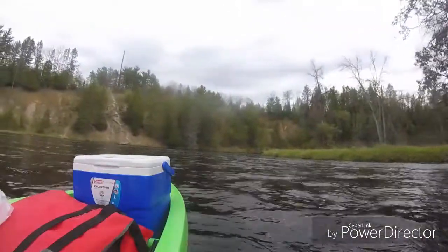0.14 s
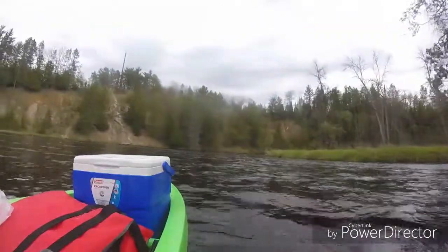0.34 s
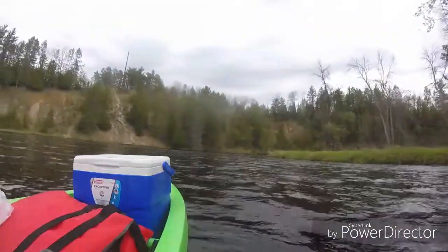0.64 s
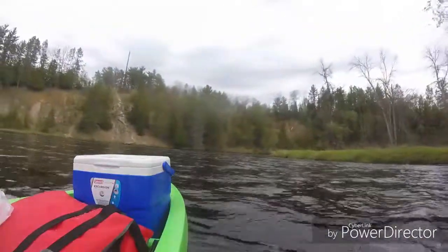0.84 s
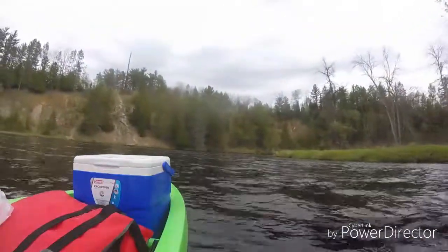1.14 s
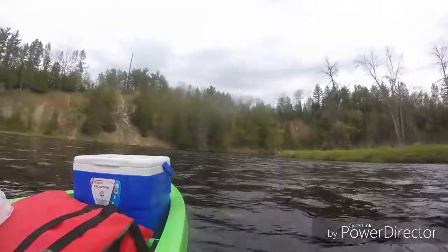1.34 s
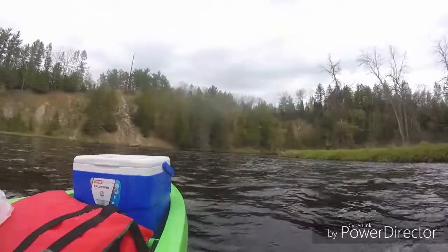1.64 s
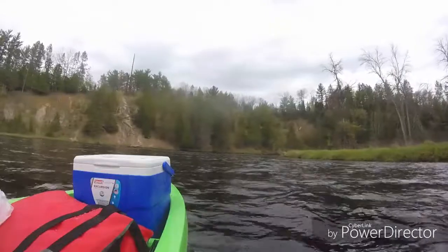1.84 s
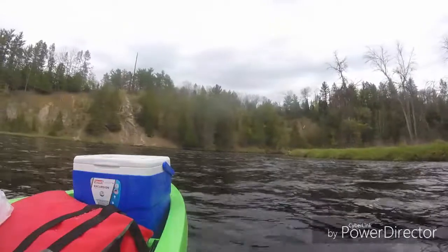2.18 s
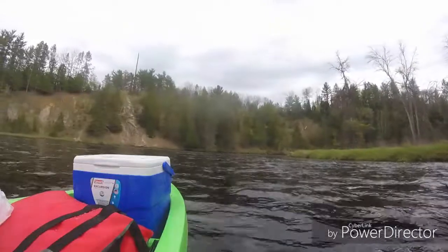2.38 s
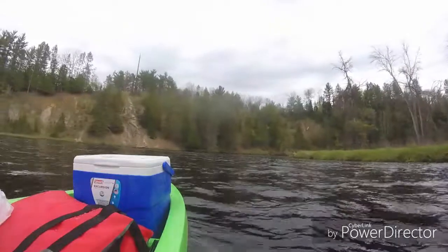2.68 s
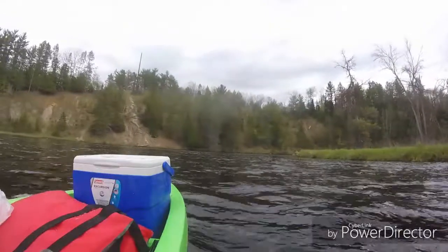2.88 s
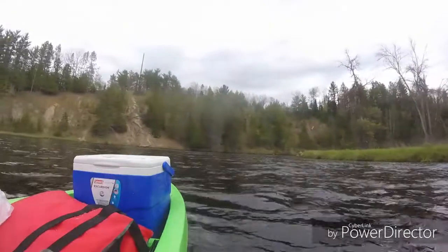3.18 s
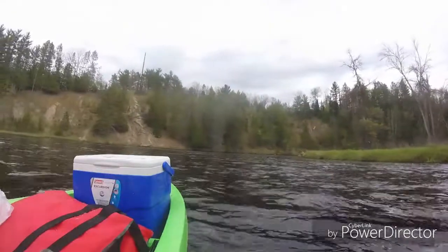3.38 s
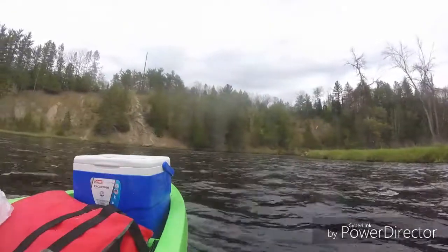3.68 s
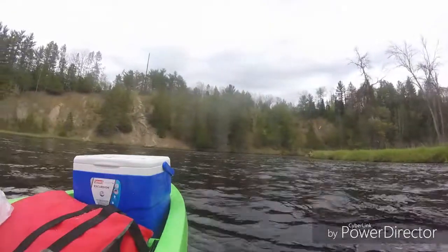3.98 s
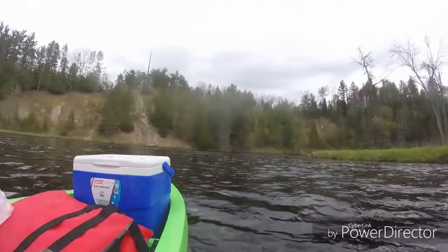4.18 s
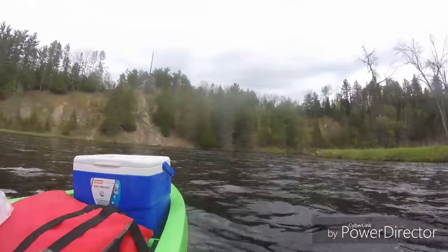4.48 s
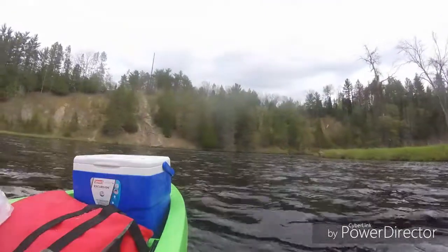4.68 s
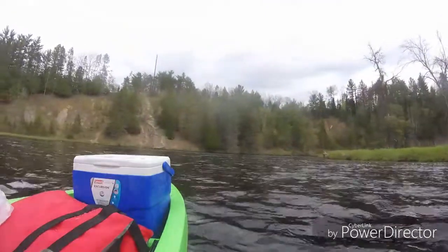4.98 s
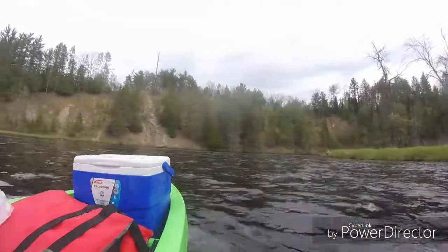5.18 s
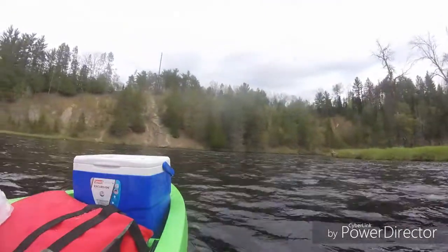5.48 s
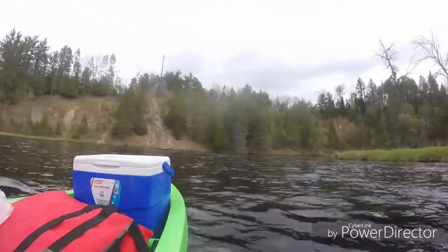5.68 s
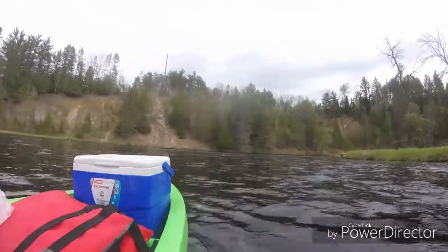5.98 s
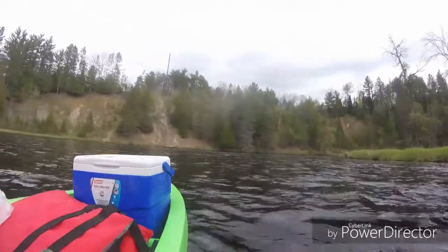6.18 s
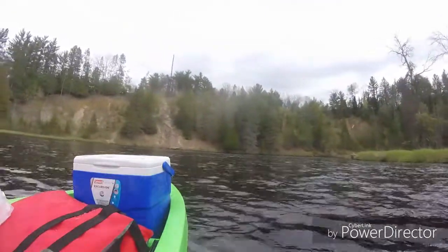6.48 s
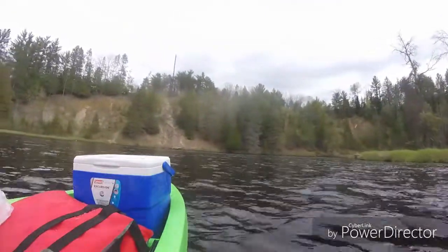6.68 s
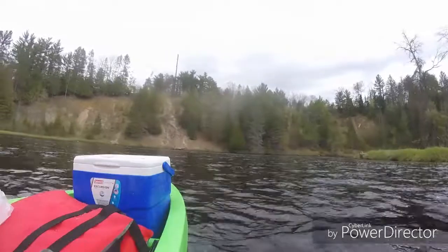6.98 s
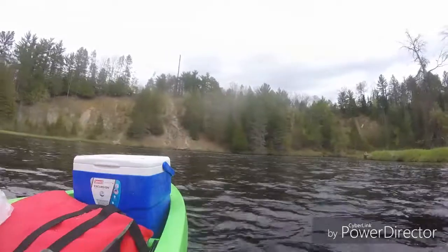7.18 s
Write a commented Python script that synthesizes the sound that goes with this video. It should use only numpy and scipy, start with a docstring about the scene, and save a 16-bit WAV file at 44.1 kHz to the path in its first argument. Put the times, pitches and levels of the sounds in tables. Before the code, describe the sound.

Irregular hollow knocks and gulps of water under a small plastic boat, soft river murmur, scattered drops, and a small bird trilling twice.

```python
"""Kayak on a river

A plastic kayak drifts downstream, heard from the cockpit; filtered noise and small bubbles murmur all around.
Wavelets slap the hull with noise bursts and trap air that gulps as swelling sines, ringing the hollow boat's modes.
Crests smack and spray in bubble clusters, drips and plops fall nearby, drops tick as clicks, pulses creak low.
A small bird on the bank sings two four-note trills of gliding tones; a farther one slurs and chirps."""
import sys
import numpy as np
from scipy import signal
from scipy.fft import rfft, irfft
from scipy.io import wavfile
from scipy.ndimage import uniform_filter1d

SR = 44100
rng = np.random.default_rng(int(sys.argv[2]) if len(sys.argv) > 2 else 0)


def digitize_waveform(pressure):
    """Quantize a signal to 16-bit integers and store it at the path in sys.argv[1].

    Rows of a 2-D input are taken as channels; values are limited to [-1, 1].
    """
    field = np.atleast_2d(pressure).T
    bounded = np.clip(field, -1, 1)
    quanta = np.round(bounded * 32767).astype(np.int16)
    wavfile.write(sys.argv[1], SR, quanta)


N = 323694
TIME = np.arange(N) / SR
SHORT = TIME[:SR // 4]  # time axis of one brief sound


def undb(db):
    """Decibels to gain."""
    return 10 ** (np.asarray(db) / 20)


def level(x, db):
    """Scale to an rms level."""
    return x * undb(db) / np.sqrt(np.mean(x ** 2))


def peak(x, gain):
    """Scale so that the peak is this many decibels."""
    return x * undb(gain) / np.abs(x).max()


def add(out, start_s, x):
    """Mix a short sound in at a time."""
    i = max(int(start_s * SR), 0)
    out[i:i + len(x)] += x[:max(N - i, 0)]


def band(x, lo_hz, hi_hz):
    """Gentle band-pass."""
    edges = [lo_hz, min(hi_hz, SR / 2 - 1)]
    return signal.sosfilt(signal.butter(2, edges, "band", fs=SR, output="sos"), x)


def colour(x, points):
    """Shape by a (Hz, dB) spectrum that falls away below its first point."""
    hz, db = np.transpose(points)
    f = np.maximum(np.fft.rfftfreq(N, 1 / SR), 1)
    gain = undb(np.interp(np.log(f), np.log(hz), db))
    low_cut = np.minimum(f / hz[0], 1) ** 2
    return irfft(rfft(x) * gain * low_cut, N)


def walk(rate_hz):
    """Smooth random wander with a spread of 1."""
    k = int(SR / rate_hz)
    steps = np.repeat(rng.standard_normal(N // k + 1), k)
    wander = uniform_filter1d(steps, k)[:N]
    return wander / wander.std()


def whistle(hz):
    """A pure tone that follows a pitch curve."""
    return np.sin(2 * np.pi * np.cumsum(hz) / SR)


def pocket(hz, cycles, glide, sharp):
    """A pocket of air swells into oscillation and dies, its pitch sliding as its shape changes."""
    t = SHORT[:int(10 * SR * cycles / hz)]
    age = t * hz / cycles  # 1 at the loudest moment
    swell = (age * np.exp(1 - age)) ** sharp
    return swell * whistle(hz * (1 + glide * np.tanh(age - 1)))


def restless(spectrum, flicker_db):
    """Water noise whose octaves swell and ebb on their own."""
    noise = rfft(rng.standard_normal(N))
    octave = np.log2(np.maximum(np.fft.rfftfreq(N, 1 / SR), 1))
    out = np.zeros(N)
    for k in range(4, 15):
        share = np.clip(1 - abs(octave - k), 0, 1)
        out += irfft(noise * share, N) * undb(flicker_db * (walk(7) + walk(22)))
    return colour(out, spectrum)


def bubbles(count, hz, spread, cycles, scatter_db):
    """Many small bubbles of random size and loudness, strewn over the whole scene."""
    out = np.zeros(N)
    draws = zip(rng.random(count), rng.standard_normal((count, 2)))
    for when, (size, loud) in draws:
        bubble = pocket(hz * np.exp(spread * size), cycles, glide=0.044, sharp=0.83)
        loud_db = scatter_db * np.tanh(loud / 2) * 2
        add(out, when * N / SR, undb(loud_db) * bubble)
    return out


# tone of the nearby current: pitch_hz [Hz], relative density_db [dB per Hz]
CURRENT_SPECTRUM = [(12, -85), (20, 3), (55, -8.5), (117, -11.5), (284, -12.5), (345, -11.5), (383, -13),
                    (613, -11), (718, -14), (855, -15.5), (966, -21), (1300, -20), (1690, -27.5),
                    (2860, -120)]
# tone of the far ripples: pitch_hz [Hz], relative density_db [dB per Hz]
RIPPLE_SPECTRUM = [(1100, -11), (1500, -2.5), (1950, 3), (2400, -7), (3000, -7), (3700, -11.5), (6200, -15),
                   (7000, -20.5), (8200, -19.5), (9200, -26.5), (10500, -24.5), (15000, -36.5)]
# strength of the current: time_s [s], level_db [dB]
CURRENT_STRENGTH = [(0, -0.5), (1.6, 0.06), (3.1, 1.5), (3.9, -1), (5.6, 0), (6.7, -2), (7.34, -0.5)]


def river():
    """Flickering noise makes the low murmur and the far ripples' hiss; crowds of bubbles gurgle in them."""
    murmur = level(restless(CURRENT_SPECTRUM, flicker_db=1.0), -52)
    hiss = level(restless(RIPPLE_SPECTRUM, flicker_db=0.74), -58)
    gurgle = level(bubbles(count=420, hz=599, spread=0.1522, cycles=3.7, scatter_db=2), -59.5)
    trickle = level(bubbles(count=420, hz=1750, spread=.18, cycles=2.5, scatter_db=5.5), -66)
    fizz = level(bubbles(count=420, hz=3100, spread=.17, cycles=3, scatter_db=5.5), -71.5)
    strength_db = np.interp(TIME, *np.transpose(CURRENT_STRENGTH))
    return (murmur + hiss + gurgle + trickle + fizz) * undb(strength_db)


# a brief low creak, perhaps the seat or the load shifting
CREAK_START_S, CREAK_ATTACK_S, CREAK_HOLD_S, CREAK_RELEASE_S = 0.321, 0.05, 0.027, 0.062
CREAK_DB = -42  # rms before the fade in and out


def creak(hz, jitter, body_hz):
    """Plastic sticks and slips in a quick, uneven run of pulses that the boat muffles."""
    phase = np.cumsum(hz * (1 + jitter * walk(151.2))) / SR
    pulses = np.diff(np.floor(phase), prepend=0)  # one per cycle
    slips = pulses * undb(3 * walk(180)) + .03 * rng.standard_normal(N)
    body = band(band(slips, 110, body_hz), 90, 610)
    edge = 0.06 * band(slips, 1940, 2800)
    corners = np.cumsum([CREAK_START_S, CREAK_ATTACK_S, CREAK_HOLD_S, CREAK_RELEASE_S])
    return level(body + edge, CREAK_DB) * np.interp(TIME, corners, [0, 1, 1, 0])


# drops ticking on the deck: start_s [s], level_db [dB], centre_hz of the click [Hz]
DECK_DROPS = [(.3628, -46.5, 9000), (1.5546, -48.5, 9000), (1.7946, -49, 6500), (1.923, -51, 8000),
              (1.9483, -45, 7550), (2.045, -57, 11000), (2.2245, -38.5, 5500), (2.549, -49, 9500),
              (2.667, -42.5, 5550), (2.7975, -45, 6800), (3.3693, -44.5, 6960), (4.1574, -55, 10000),
              (4.325, -57, 11000), (5.9935, -42.5, 6550), (7.0933, -43.5, 7000)]


def ticks():
    """Drops land with a bright noise click; fainter ones fall at random between 1.4 and 5 s."""
    out = np.zeros(N)
    faint = [(1.4 + 3.6 * when, -62 + 8 * size, 8500) for when, size in rng.random(size=(36, 2))]
    for start_s, level_db, hz in list(DECK_DROPS) + faint:
        decay = np.exp(-SHORT / 0.0017) + 0.14 * np.exp(-SHORT / 0.01)
        click = band(rng.standard_normal(len(SHORT)) * decay, 0.42 * hz, 1.13 * hz)
        add(out, start_s, undb(level_db) * peak(click, 2.95))
    return out


# little plops a short way off the boat: start_s [s], level_db [dB], pitch_hz [Hz]
NEARBY_PLOPS = [(.463, -41, 664), (.62, -46.5, 620), (1.969, -41, 550), (4.461, -47.5, 515),
                (4.49, -43, 420), (4.955, -49, 622), (5.55, -44.5, 560), (6.395, -46.5, 598),
                (7.22, -40.5, 593)]


def plops():
    """Wavelets fold over and each closes on a bubble that rises in pitch."""
    out = np.zeros(N)
    for start_s, level_db, hz in NEARBY_PLOPS:
        add(out, start_s, undb(level_db) * pocket(hz, cycles=3.4, glide=0.07, sharp=0.84))
    return out


# a more distant bird's falling slurs: start_s [s], level_db at the start [dB]
FAR_SLURS = [(.735, -61), (1.009, -60), (1.281, -66.5)]
# its short V-shaped chirps: start_s [s], level_db [dB], length_s [s], lowest_hz [Hz]
FAR_CHIRPS = [(.888, -64.5, .052, 5930), (1.168, -63, 0.028, 5980), (1.452, -70, .024, 6250),
              (2.078, -64.5, 0.045, 5800), (5.35, -68, 0.047, 5800)]
SLUR_TOP_HZ, SLUR_FALL_HZ, SLUR_S, SLUR_FADE_DB = 6360, 1750, 0.067, -12
CHIRP_RISE_HZ = 655  # each end of a chirp above its lowest pitch


def slurs():
    """The distant bird whistles fading, falling slurs, and chirps that dip and turn back up."""
    out = np.zeros(N)
    u = np.linspace(0, 1, int(SLUR_S * SR))  # progress through the call
    slur_hz = SLUR_TOP_HZ - SLUR_FALL_HZ * u ** 1.5
    calls = [(start_s, level_db + SLUR_FADE_DB * u, slur_hz) for start_s, level_db in FAR_SLURS]
    for start_s, level_db, length_s, lowest_hz in FAR_CHIRPS:
        u = np.linspace(0, 1, int(length_s * SR))
        vee = np.interp(u, [0, .4, 1], [1, 0, 1]) ** 1.4
        calls.append((start_s, level_db, lowest_hz + CHIRP_RISE_HZ * vee))
    for start_s, level_db, hz in calls:
        waver_db = 2.5 * walk(130)[:len(hz)]
        fade = signal.windows.tukey(len(hz), .35)
        add(out, start_s, undb(level_db + waver_db) * fade * whistle(hz))
    return out


def splash(hz, spread):
    """A quick cluster of tiny bubbles, each weaker than the last."""
    out = np.zeros(len(SHORT))
    for k, (delay, size) in enumerate(rng.standard_normal(size=(7, 2))):
        bubble = pocket(hz * np.exp(spread * size), cycles=0.99, glide=0.011, sharp=0.37)
        add(out, k * 0.0014 + abs(delay) * 0.00076, undb(-2.45 * k) * bubble)
    return out


# drips falling into the river beside the boat: start_s [s], level_db [dB], pitch_hz [Hz]
RIVER_DRIPS = [(1.46, -49, 3080), (1.467, -49, 3120), (1.48, -44.5, 2850), (1.969, -40, 2860),
               (2.188, -49, 3040), (2.223, -44, 2750), (2.375, -48, 2820), (2.8, -41.5, 2900),
               (2.844, -51, 2920), (2.869, -48, 1800), (3.487, -40, 3000), (4.245, -52, 2850),
               (4.424, -51, 3100), (5.724, -44, 1990), (6.049, -43, 1750), (6.536, -43, 1950)]


def drips():
    """Drips land in the river with a small, high splash."""
    out = np.zeros(N)
    for start_s, level_db, hz in RIVER_DRIPS:
        add(out, start_s, undb(level_db) * splash(hz, spread=0.015))
    return out


def gulp(hz, cycles, glide):
    """Air squeezed against the shell oscillates, swelling smoothly and dying as it vents."""
    age = SHORT[:int(4 * SR * cycles / hz)] * hz / cycles  # 1 at the loudest moment
    swell = age ** 2 * np.exp(1 - age ** 2)
    return 0.72 * swell * whistle(hz * (1 + glide * np.tanh(age - 1)))


# pockets of air squeezed under the hull:
# start_s [s], level_db [dB], pitch_hz [Hz], swell_s [s], glide [share of the pitch]
AIR_POCKETS = [(1.469, -38, 582, 0.0093, -0.04), (2.085, -30, 617, 0.011, -0.073),
               (2.085, -23, 406, 0.0061, -0.055), (2.103, -29.5, 508, 0.0097, -0.06),
               (2.109, -18.5, 333, 0.0051, -0.022), (2.127, -27, 326, 0.0098, -0.066),
               (2.155, -39.5, 272, 0.026, 0.035), (2.19, -33, 385, 0.0068, 0.054),
               (2.204, -40, 648, 0.012, 0.033), (2.215, -45, 414, 0.019, .03),
               (2.8001, -16, 333, 0.0044, 0.0041), (2.812, -27, 301, 0.012, .06),
               (2.8431, -17, 296, 0.0076, -0.058), (2.866, -27, 300, 0.009, -0.12),
               (3.4488, -20, 290, 0.0045, -0.047), (3.473, -30, 321, 0.015, -0.052),
               (4.016, -34.5, 356, 0.008, .12), (4.026, -34.5, 558, 0.0099, 0.04),
               (4.13, -26.5, 318, 0.0059, 0.084), (4.144, -31.5, 334, 0.01, -0.042),
               (4.17, -42, 322, 0.019, 0.02), (4.55, -26.5, 542, 0.01, 0.042),
               (4.569, -37.5, 533, 0.014, -0.057), (5.2233, -23, 351, 0.0083, -0.012),
               (5.235, -19.5, 331, 0.0046, -0.027), (5.249, -26.5, 295, 0.0063, -0.063),
               (5.278, -39.5, 302, 0.016, .08), (5.9937, -18.5, 313, 0.0048, -0.1),
               (6.015, -24.5, 283, 0.0058, -0.07), (6.038, -29, 294, 0.0043, -.08),
               (6.197, -36.5, 332, 0.0089, 0), (6.469, -32.5, 592, 0.011, 0.017)]
PUSH_DB, PUSH_HZ = -17, 161  # flexing of the shell, dB re the pocket's bulk
HEAVE_DB, HEAVE_S = -19.5, 0.0013  # dull thump as the whole shell gives, dB re the pocket's bulk


def gulps():
    """Trapped air gulps under the hull; a push of water, strongest with low pockets, flexes and heaves the shell."""
    out = np.zeros(N)
    heave = -SHORT / HEAVE_S * np.exp(1 - SHORT / HEAVE_S)
    for start_s, level_db, hz, swell_s, glide in AIR_POCKETS:
        add(out, start_s, undb(level_db) * gulp(hz, swell_s * hz, glide))
        bulk = undb(level_db) * min(310 / hz, 1) ** 2
        push = pocket(PUSH_HZ, cycles=0.93, glide=-0.023, sharp=1.46)
        add(out, start_s, bulk * undb(PUSH_DB) * push)
        add(out, start_s, bulk * undb(HEAVE_DB) * heave)
    return out


def slap(hz):
    """A crest hits the shell: a short, dull smack of noise around a quick rising ring."""
    noise = rng.standard_normal(len(SHORT)) * np.exp(-SHORT / 0.005)
    dull = band(band(noise, 0.67 * hz, 1.155 * hz), 0.5 * hz, 1.4 * hz)
    out = peak(dull, 0.72)
    add(out, 0, 0.94 * pocket(hz, cycles=1.55, glide=0.045, sharp=2.5))
    return out


def slosh(hz, decay_s):
    """Water drains off the shell after a wave: band noise that starts quickly and fades."""
    wash = level(band(rng.standard_normal(len(SHORT)), 0.31 * hz, 1.24 * hz), 0)
    return wash * np.exp(-SHORT / decay_s) * (1 - np.exp(-SHORT / 0.00018))


# wavelets that slap the hull and slosh off:
# start_s [s], slap_db [dB], slap_hz [Hz], slosh_db [dB], slosh_hz [Hz]
WAVELETS = [(1.47, -41, 690, -54, 560), (2.084, -32.5, 744, -35, 326), (2.189, -40, 900, -38, 490),
            (2.7956, -31, 863, -35, 378), (2.8427, -34.5, 650, -45, 340), (3.4463, -36, 706, -36, 285),
            (4.0118, -29, 707, -45, 520), (4.1288, -39, 800, -40.5, 446), (4.549, -46, 580, -44.5, 510),
            (5.2202, -33, 810, -39.5, 336), (5.992, -32, 780, -34, 250), (6.1972, -33, 780, -45, 585),
            (6.467, -45, 850, -46, 520)]
SLOSH_DECAY_S, SLOSH_DELAY_S = 0.035, 0.002603
ROCK_DB, ROCK_DECAY_S = -13, 0.12  # rumble, dB re the wave's slosh


def laps():
    """Each wavelet slaps the shell, and the water sloshes off."""
    out = np.zeros(N)
    for start_s, slap_db, slap_hz, slosh_db, slosh_hz in WAVELETS:
        add(out, start_s, undb(slap_db) * slap(slap_hz))
        add(out, start_s + SLOSH_DELAY_S, undb(slosh_db) * slosh(slosh_hz, SLOSH_DECAY_S))
    return out


def rocking():
    """After each wavelet the boat rocks with a low noise rumble that dies away."""
    push = np.zeros(N)
    swing = np.exp(-TIME / ROCK_DECAY_S) * (1 - np.exp(-TIME / 0.0043))
    for start_s, _, _, slosh_db, _ in WAVELETS:
        add(push, start_s, undb(slosh_db + ROCK_DB) * swing)
    return push * level(band(rng.standard_normal(N), 25, 81), 0)


# crests that break on the shell and pinch off a small bubble: start_s [s], smack_db [dB], smack_hz [Hz],
# spray_db [dB], spray_hz [Hz], bubble_db [dB], bubble_hz [Hz]
BREAKING_CRESTS = [(1.481, -59, 810, -64, 1600, -42.5, 840),
                   (2.9046, -32.5, 1090, -42.5, 2020, -38.5, 1143),
                   (3.49, -36.5, 1100, -34.5, 2160, -45.5, 1100),
                   (3.562, -38, 1010, -38.5, 1760, -43, 1460), (4.2199, -36.5, 720, -64, 1390, -52, 780),
                   (6.0223, -32, 940, -57, 1510, -34.5, 1034)]
SPRAY_LEAD_S = 0.00208  # spray flies just before the smack
BUBBLE_SWELL_S, BUBBLE_GLIDE = 0.0031, -0.039  # glide as a share of the pitch
RUNOFF_DB, RUNOFF_DECAY_S, RUNOFF_HZ = -5, 0.011, 516  # water running off, dB re the smack


def smacks():
    """A breaking crest smacks the shell, throws spray, leaves a ringing bubble and runs off."""
    out = np.zeros(N)
    for start_s, smack_db, smack_hz, spray_db, spray_hz, bubble_db, bubble_hz in BREAKING_CRESTS:
        add(out, start_s, undb(smack_db) * slap(smack_hz))
        bubble = pocket(bubble_hz, BUBBLE_SWELL_S * bubble_hz, BUBBLE_GLIDE, sharp=0.5)
        add(out, start_s, undb(bubble_db) * bubble)
        add(out, start_s, undb(smack_db + RUNOFF_DB) * slosh(RUNOFF_HZ, RUNOFF_DECAY_S))
        add(out, start_s - SPRAY_LEAD_S, undb(spray_db) * splash(spray_hz, spread=0.062))
    return out


# ringing modes of the hollow hull: pitch_hz [Hz], relative level_db [dB], t60_s, the time to fall 60 dB [s]
HULL_MODES = [(155.7, 16.5, 0.11), (240.7, 6.5, 0.16), (294, -7, 0.15), (371, 20, 0.03), (620, -12, 0.039),
              (930, -14, 0.052), (1115, 17, 0.031), (1904, 26.5, 0.049)]


def hull(x, ring_db, wash_db, wash_t60):
    """The shell passes each blow directly, rings in its modes and scatters it inside the boat."""
    ring = np.zeros(len(SHORT))
    for hz, level_db, t60_s in HULL_MODES:
        decay = np.exp(-np.log(1000) * SHORT / t60_s)
        ring += undb(level_db) * decay * np.cos(2 * np.pi * hz * SHORT)
    wash = band(rng.standard_normal(len(SHORT)), 136, 1000)
    wash *= np.exp(-np.log(1000) * SHORT / wash_t60) * (1 - np.exp(-SHORT / 0.0012))
    response = undb(ring_db) * ring + undb(wash_db) * wash
    return x + signal.fftconvolve(x, response)[:N]


# notes of two four-note trills: start_s [s], length_s [s], level_db [dB], lowest_hz [Hz], fall_s [s],
# final rise_hz [Hz], opening flick_db re the note [dB], crest_s, the delay to the loudest point [s]
TRILL_NOTES = [(2.216, 0.061, -52, 4320, 0.022, 49, -14, 0.037),
               (2.314, 0.092, -50, 4350, 0.019, 200, -3.5, 0.019),
               (2.407, 0.094, -49, 4310, 0.018, 140, -11, .056),
               (2.508, 0.11, -45.5, 4280, 0.019, 274, -16, 0.047),
               (6.889, .089, -52.5, 4250, 0.029, 25, -20, 0.044),
               (6.988, .096, -46.5, 4250, .021, 95, -7, 0.04),
               (7.09, 0.075, -48, 4320, 0.018, 47, -12, 0.036),
               (7.183, 0.12, -46.5, 4230, 0.017, 107, -7, 0.038)]
# each note swells from this level re its crest, then sags and ends
NOTE_START_DB, NOTE_SAG_DB_PER_S, NOTE_RELEASE_S = -8, -97, 0.019


def trills(flick_hz, fall_hz):
    """Each trill note opens with a two-voiced flick, slides down and swells into a whistle that sags away."""
    out = np.zeros(N)
    for start_s, length_s, level_db, lowest_hz, fall_s, rise_hz, flick_db, crest_s in TRILL_NOTES:
        t = SHORT[:int(length_s * SR)]
        flick = np.exp(-((t - .0045) / 0.0031) ** 2)
        fall = np.exp(-(t / fall_s) ** 2)
        rise = np.clip((t - .045) / 0.0465, 0, 1)
        hz = lowest_hz + flick_hz * flick + fall_hz * fall + rise_hz * rise
        swell_db = NOTE_START_DB * np.maximum(1 - t / crest_s, 0)
        sag_db = NOTE_SAG_DB_PER_S * np.maximum(t - crest_s, 0)
        gate = np.clip((t - .005) / .006, 0, 1) * np.clip((length_s - t) / NOTE_RELEASE_S, 0, 1)
        waver = undb(1.5 * walk(140)[:len(t)])
        body = undb(swell_db + sag_db) * gate * waver * whistle(hz)
        opening = undb(flick_db) * flick * (whistle(hz) + .7 * whistle(.87 * hz))
        add(out, start_s, undb(level_db) * (body + opening))
    return out


TREES_ECHO_DB, TREES_DECAY_S = -13.5, .05
BANK_ECHO_DB, BANK_ECHO_S = -15, .043


def birds():
    """Two birds; the trees echo them as a fading noise tail, the far bank as one delayed copy."""
    out = trills(flick_hz=896, fall_hz=735) + slurs()
    trees = rng.standard_normal(len(SHORT)) * np.exp(-SHORT / TREES_DECAY_S)
    trees /= np.linalg.norm(trees)
    echo = undb(TREES_ECHO_DB) * signal.fftconvolve(out, trees)[:N]
    add(echo, BANK_ECHO_S, undb(BANK_ECHO_DB) * out)
    return out + echo


def scene():
    """Water on the boat, the river around it, birds on the bank."""
    blows = laps() + gulps() + smacks()
    boat = hull(blows, ring_db=-61.0, wash_db=-34, wash_t60=0.17)
    boat += creak(hz=183.3, jitter=0.037, body_hz=676)
    water = rocking() + drips() + ticks() + plops() + river()
    return (boat + water + birds())[None]


TOP_HZ = 15200


def record(dry):
    """A steep low-pass cuts the top of the treble."""
    return signal.sosfilt(signal.ellip(10, .2, 70, TOP_HZ, fs=SR, output="sos"), dry)


dry = scene()
out = record(dry)
digitize_waveform(out)
```